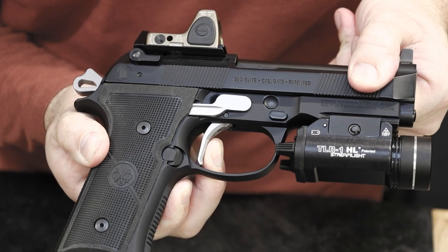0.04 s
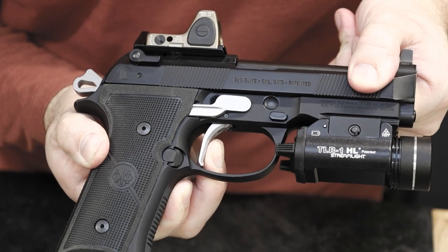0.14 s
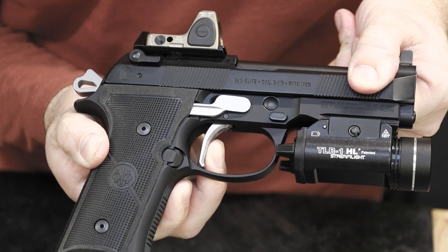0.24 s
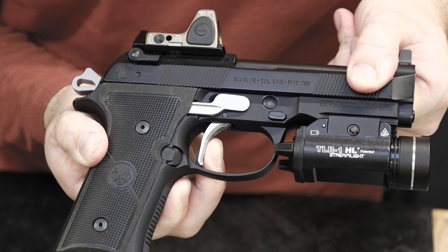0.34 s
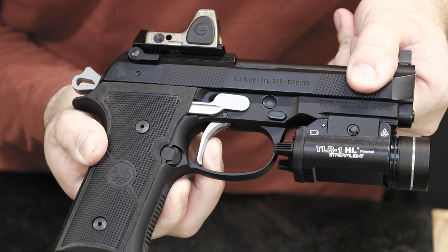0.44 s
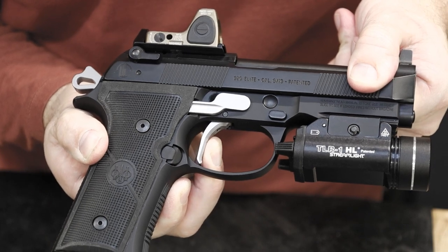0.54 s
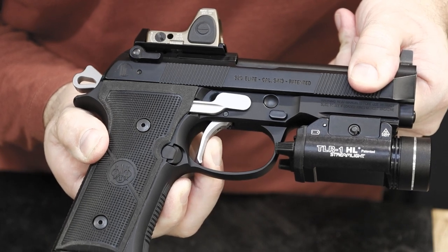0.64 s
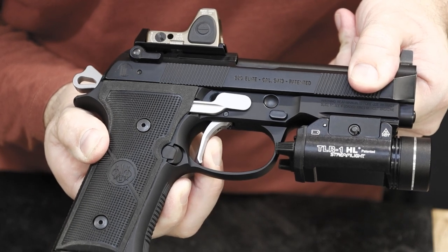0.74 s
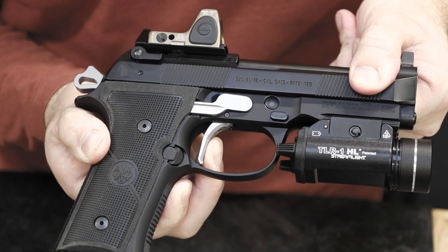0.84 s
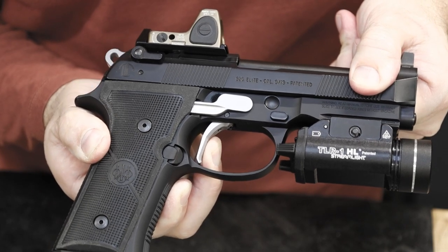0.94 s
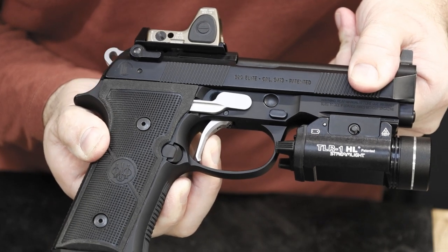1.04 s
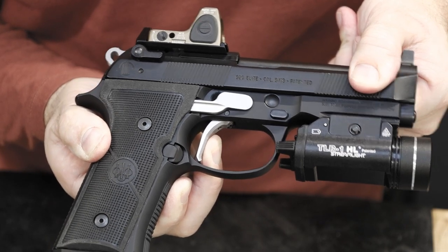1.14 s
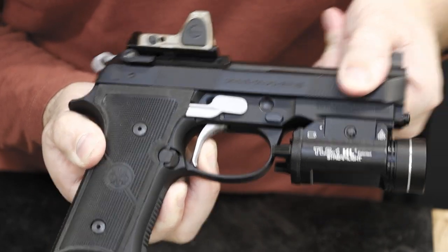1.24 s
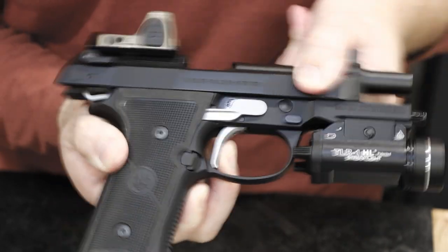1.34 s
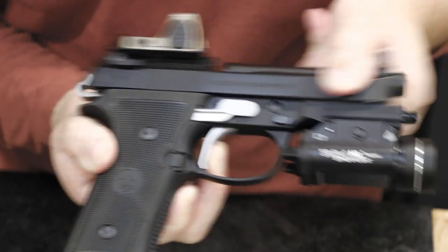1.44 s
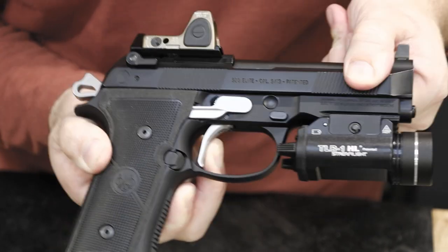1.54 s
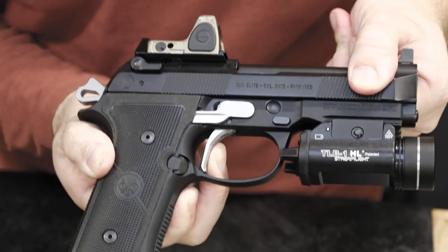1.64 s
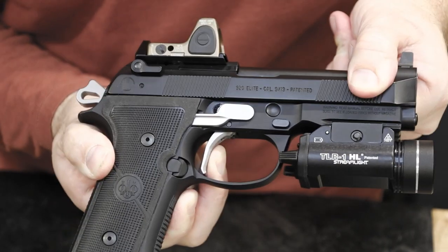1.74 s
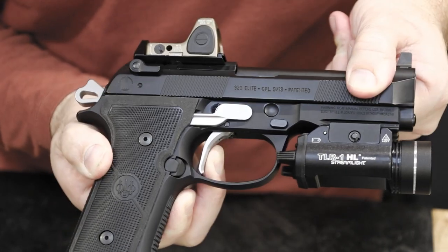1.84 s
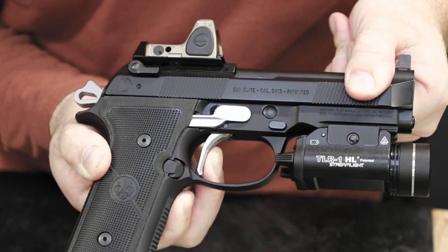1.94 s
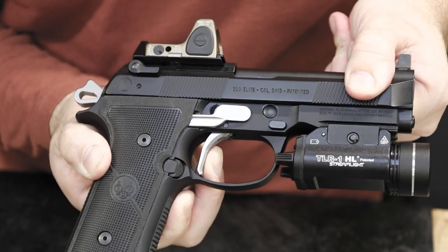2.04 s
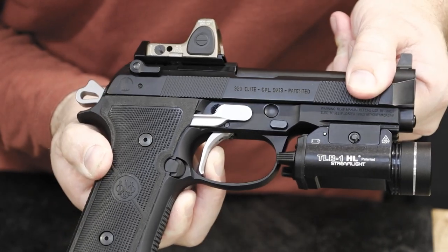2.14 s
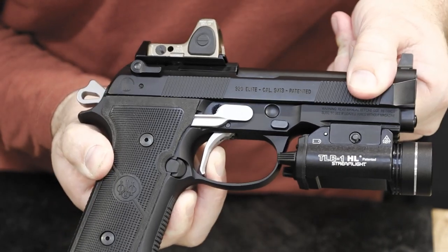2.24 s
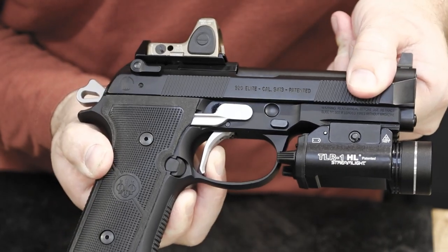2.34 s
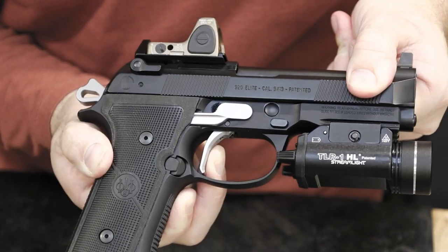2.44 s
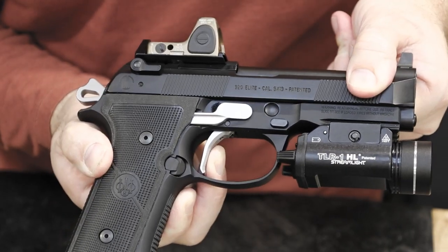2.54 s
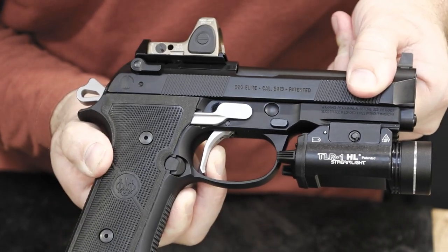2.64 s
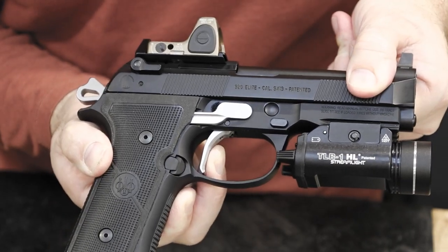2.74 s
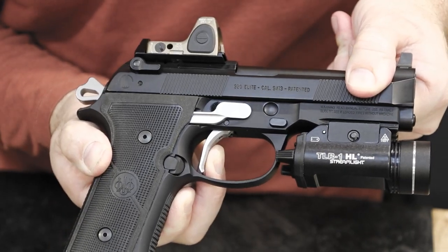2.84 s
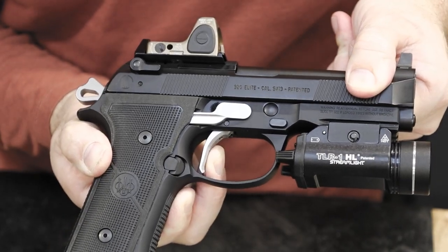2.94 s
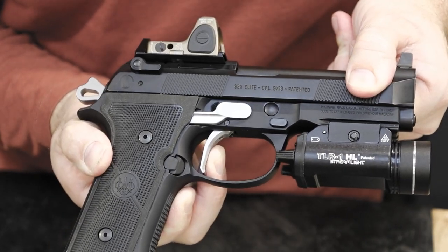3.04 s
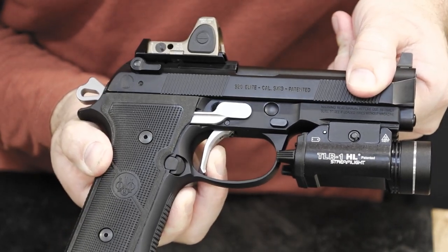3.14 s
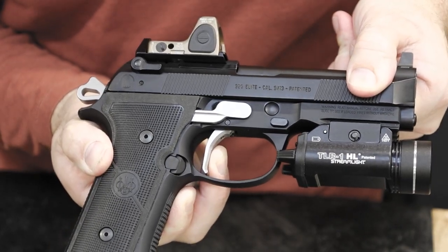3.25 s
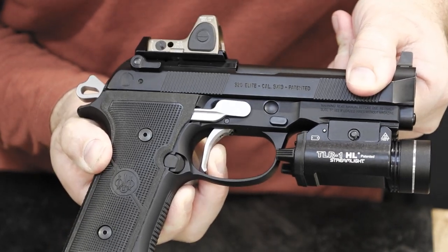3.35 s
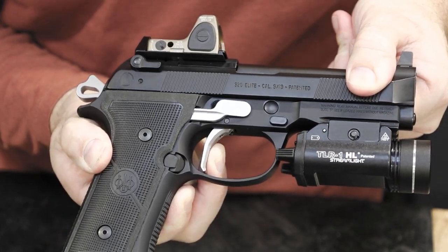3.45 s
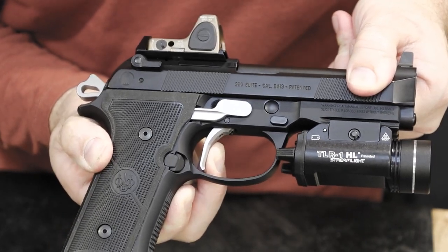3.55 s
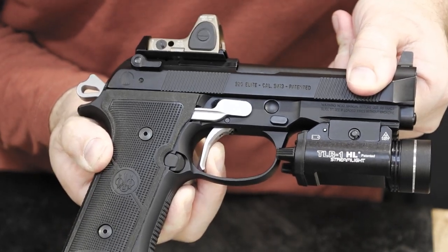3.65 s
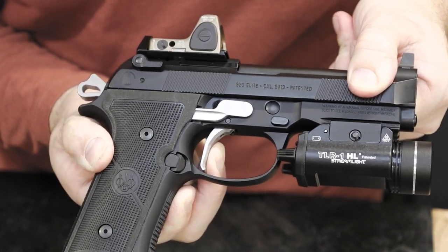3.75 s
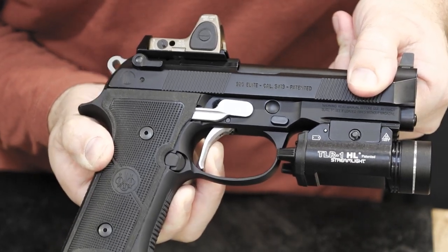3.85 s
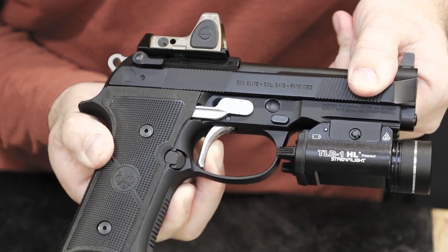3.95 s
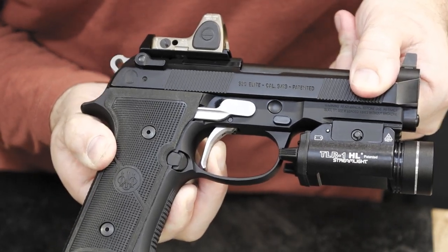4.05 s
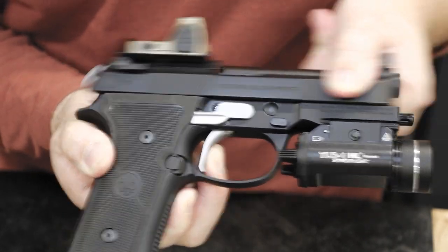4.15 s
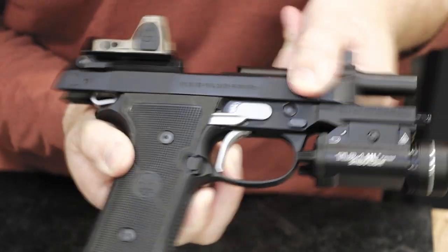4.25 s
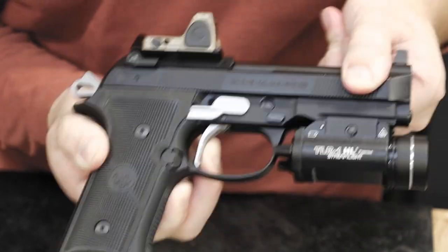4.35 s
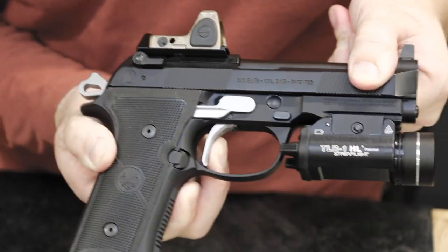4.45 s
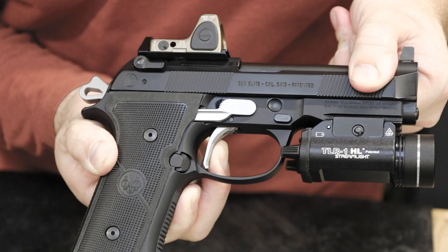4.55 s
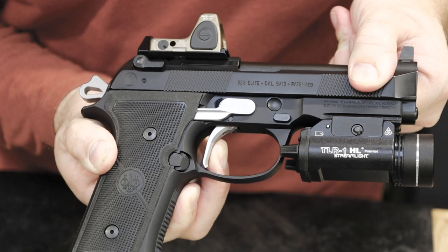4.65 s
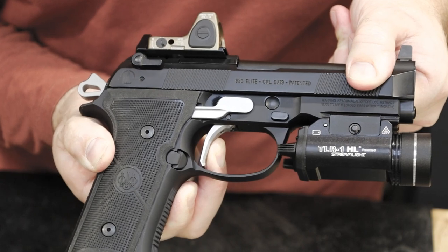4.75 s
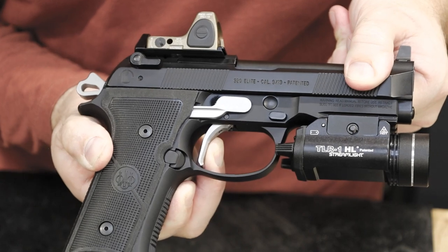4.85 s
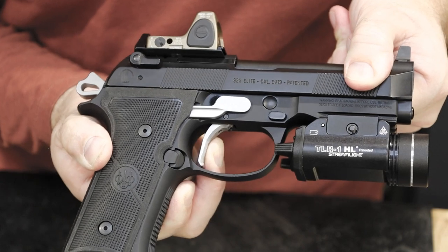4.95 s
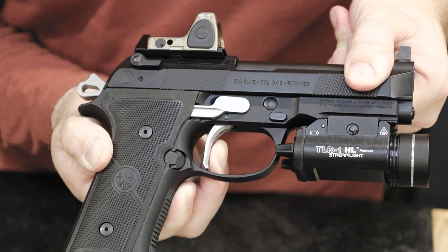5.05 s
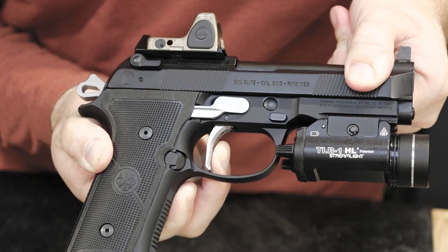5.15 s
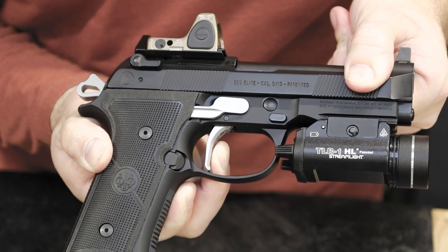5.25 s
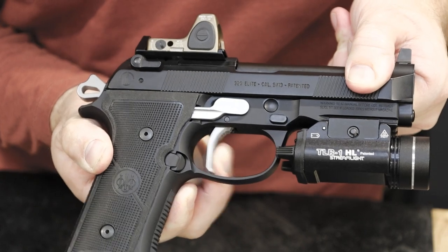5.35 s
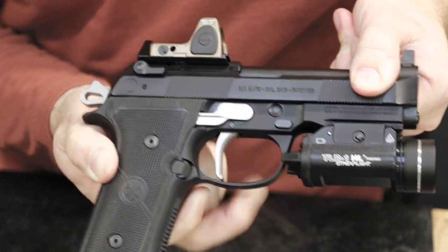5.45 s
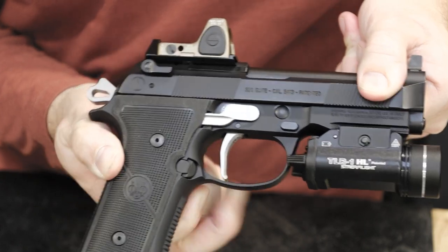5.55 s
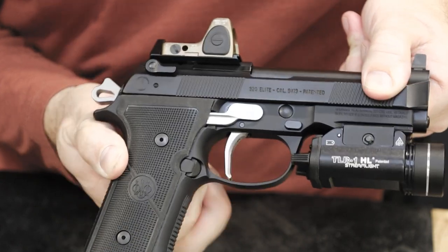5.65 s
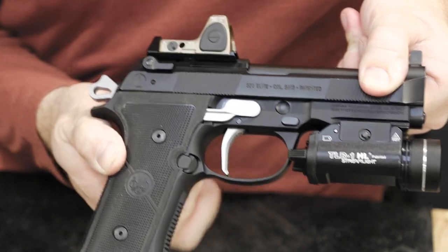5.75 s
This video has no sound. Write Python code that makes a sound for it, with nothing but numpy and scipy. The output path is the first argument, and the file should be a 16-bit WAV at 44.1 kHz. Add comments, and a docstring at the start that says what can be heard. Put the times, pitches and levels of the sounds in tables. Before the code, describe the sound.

Bright steel contacts of a handgun, captured close indoors: a crisp double-edged trigger reset, a cracking hammer fall, a clattering slide pull with brief scraping, and a heavy slam with a tiny bounce. It happens twice, then a last reset and barely audible ticks. Short room tails swell after hard blows, over soft air and motor hum.

```python
"""A click of a pistol's trigger resetting, then the fall of the hammer and the racked slide slamming shut, heard twice.
The unloaded pistol is close by in a hard, reverberant room; a last reset and light ticks follow over a ventilation hum.
Each contact is a noise crack, a sine knock and ringing modes; the rails rub with uneven noise.
One dull echo and decaying noise tails make the room; shaped noise makes the ventilation.
A limiter ducks on the hard blows and lets the room swell back."""
import sys
import numpy as np
from scipy import signal
from scipy.fft import rfft, irfft, next_fast_len
from scipy.io import wavfile
from scipy.ndimage import uniform_filter1d, minimum_filter1d

SR = 44100
rng = np.random.default_rng(int(sys.argv[2]) if len(sys.argv) > 2 else 0)


def wrap_up_sound(samples):
    """Save the sound to the file named by the first command line argument, as 16-bit audio."""
    columns = np.atleast_2d(samples).T
    # keep every value between -1 and 1, then stretch to whole-number steps
    tamed = np.clip(columns, -1, 1)
    steps = np.round(tamed * 32767).astype(np.int16)
    wavfile.write(sys.argv[1], SR, steps)


N = 255322  # length of the scene [samples]

# Slide pulled back: (time of the main blow [s], level [dB], treble tilt [dB per octave], slowness [1 = usual])
SLIDE_PULLS = [(1.3743, 0, 1, 1), (4.2393, 1.5, 1, .83)]
# Spring throws the slide shut: (time of the slam [s], level [dB], treble tilt [dB per octave],
# slowness [1 = usual], rebound after the slam [s], rebound level over the slam [dB])
SLIDE_RETURNS = [(1.5570, 11, 0.5, 1, .0083, -14), (4.4103, 13, 0, .72, .0187, -11)]
# Crack of the slide's steel on steel: (frequency [Hz], relative density [dB per Hz])
SLIDE_CRACK = [(40, -48), (300, -21), (800, -15.5), (1400, 3), (2700, 0.5), (3600, 3), (6000, -4),
               (9800, -5), (11000, -10), (16000, -20)]


def pistol():
    """Contacts and rubbing sent in one direction; each call draws new fine detail for another direction."""
    return trigger() + hammer() + slide() + rails(grit_db=3.5)


def trigger():
    """Small contacts ring the frame: trigger resets, then light ticks as the finger leaves the trigger."""
    # Ringing of the frame: (frequency [Hz], relative level [dB], t60 [s])
    frame_modes = [(1080, -19, 0.023), (1465, -11.5, .014), (1790, -7.5, 0.011), (2570, -10.5, 0.0064),
                   (3400, -1.5, .007), (3790, -13, .012), (5250, -18.5, 0.008), (6260, -16.5, 0.0056),
                   (7730, -13, .008), (9780, -10, 0.0059), (10230, -12.5, 0.0042)]
    # Crack of steel on the frame: (frequency [Hz], relative density [dB per Hz])
    frame_crack = [(40, -47), (300, -27.5), (800, -15), (1250, -1), (2200, 7), (3600, 2.5), (5500, 5.5),
                   (8000, 5), (11000, 2.5), (16000, -1)]
    # Light ticks: (time [s], level [dB], treble tilt [dB per octave], knock [Hz], knock level [dB], crack t60 [s])
    ticks = [(5.4698, -28.5, -3, 3400, 12, 0.011), (5.4985, -43, -4, 7000, -11, .02),
             (5.7343, -41, -4.5, 1100, 6, 0.012)]
    return contacts([*resets(), *ticks], frame_modes, frame_crack, crack_db=2, ring_db=1.5)


def resets():
    """The trigger bar snaps up, then seats on the sear in a second, softer and duller contact."""
    # Resets: (time [s], level [dB], treble tilt [dB per octave], knock [Hz], knock level [dB])
    trigger_resets = [(.2867, -5.5, -0.3, 1750, -7), (3.2690, -3.5, -0.5, 1780, 0),
                      (5.0787, -2, 2, 4800, 3)]
    crack_t60 = 0.010  # s, for both contacts
    seat_after_s, seat_db, seat_tilt_db = 0.0025, -8, -2  # tilt in dB per octave
    rows = []
    for s, db, tilt_db, *knock in trigger_resets:
        rows.append((s, db, tilt_db, *knock, crack_t60))
        rows.append((s + seat_after_s, db + seat_db, tilt_db + seat_tilt_db, *knock, crack_t60))
    return rows


def hammer():
    """The released hammer swings and strikes, and its own modes ring."""
    # Falls: (time of the strike [s], level [dB], treble tilt [dB per octave], slowness [1 = usual])
    hammer_falls = [(1.0070, 19, 0, 1), (3.9271, 19, 0, 1.02)]
    # In order: the sear lets go, the hammer swings (two contacts) and strikes.
    # (time from the strike at usual slowness [s], level over the fall's [dB], added tilt [dB per octave],
    # knock [Hz], knock level [dB], crack t60 [s])
    fall_contacts = [(-.0086, -27.5, -1.5, 1850, -3, .03), (-.0061, -27.5, .5, 1880, -3, .02),
                     (-.0030, -19, .5, 1940, -5, .011), (0, 0, 0, 3680, -10, .025)]
    # Ringing of the hammer: (frequency [Hz], relative level [dB], t60 [s])
    hammer_modes = [(1460, -18.5, .022), (1900, -12, .011), (3290, -17.5, 0.024), (3620, -16, .018),
                    (4330, -16.5, 0.014), (5950, -14, 0.018), (7554, -22, .01), (9600, -16, .01),
                    (10100, -18, 0.0089), (12800, -19.5, .015)]
    # Crack of the hammer's strike: (frequency [Hz], relative density [dB per Hz])
    hammer_crack = [(40, -50), (300, -29), (800, -16), (1300, -3), (2500, -5.5), (3500, 0), (6000, -4),
                    (7500, 0), (10000, 1), (16000, -6)]
    rows = actions(hammer_falls, fall_contacts)
    return contacts(rows, hammer_modes, hammer_crack, crack_db=-6.5, ring_db=-1)


def slide():
    """The slide is racked, slams shut and bounces; each contact rings its steel."""
    # Both chains: (time from the main blow at usual slowness [s], level over the action's [dB], added tilt [dB
    # per octave], knock [Hz], knock level [dB], crack t60 [s]) In order: three lighter contacts lead in, the
    # slide meets its rear stop in the main blow, and three more contacts follow.
    pull_contacts = [(-.0318, -28, -1, 3500, -12, .028), (-.0160, -23, -2, 2000, 0, .027),
                     (-.0098, -8, -1.5, 3300, -3, .013), (0, 1, 0.5, 7100, -2, .012),
                     (.0123, -9, 2.5, 1800, -3, .019), (.0238, -21, 1, 3300, -12, .02),
                     (.0424, -4.5, 4, 1340, -1, .014)]
    # In order: the slide picks up the barrel (two contacts), the barrel locks, steel slams on steel and chatters.
    return_contacts = [(-.0238, -21.5, -3, 2200, -6, .022), (-.0130, -22.5, -4.5, 1400, -12, .018),
                       (-.0102, -17, -3.5, 2200, -6, .014), (0, 0, 5, 5950, -4, .014),
                       (.0045, -11.5, -1, 4300, -9, .026)]
    # Ringing of the slide: (frequency [Hz], relative level [dB], t60 [s])
    slide_modes = [(1440, -19, .02), (2120, -7, .02), (3280, -21, .025), (3620, -16, .022),
                   (4320, -18.5, .035), (4540, -24.5, 0.018), (4860, -20.5, 0.011), (5840, -18.5, .028),
                   (6030, -16, .03), (7400, -17, 0.017), (8450, -19, .02), (8500, -24, .02),
                   (13190, -27.5, .05)]
    pulls = actions(SLIDE_PULLS, pull_contacts)
    returns = actions(SLIDE_RETURNS, return_contacts)
    rows = pulls + returns + rebounds()
    return contacts(rows, slide_modes, SLIDE_CRACK, crack_db=-0.5, ring_db=-4)


def rebounds():
    """The shut slide bounces once after each slam."""
    # One bounce: (treble tilt [dB per octave], knock [Hz], knock level [dB], crack t60 [s])
    bounce = (0, 2200, -4, .021)
    return [(s + after_s, db + over_db, *bounce)
            for s, db, _, _, after_s, over_db in SLIDE_RETURNS]


def rails(grit_db):
    """Steel rubs on steel in uneven catches while the slide moves."""
    slow_noise = uniform_filter1d(rng.standard_normal(N), size=130)  # averaged over about 3 ms
    catches = amp(grit_db * unit(slow_noise))
    rub = unit(catches * noise(lambda f: amp(along(SLIDE_CRACK, f))))
    pulling = stroke(SLIDE_PULLS, over_db=-31.5, swell_db_per_s=550, fade_db_per_s=170)
    returning = stroke(SLIDE_RETURNS, over_db=-35, swell_db_per_s=300, fade_db_per_s=3000)
    return rub * (pulling + returning)


def stroke(events, over_db, swell_db_per_s, fade_db_per_s):
    """Rubbing swells as the slide gathers speed and fades after the main blow; rates hold at usual slowness."""
    t = np.arange(N) / SR
    strength = np.zeros(N)
    for s, db, _, slowness, *_ in events:
        below_peak_db = np.maximum(swell_db_per_s * (s - t), fade_db_per_s * (t - s)) / slowness
        strength += amp(db + over_db - below_peak_db)
    return strength


def actions(events, chain):
    """Every action runs through its chain of contacts, harder or softer, brighter or duller, slower or faster."""
    return [(s + slowness * after_s, db + over_db, tilt_db + own_tilt_db, *knock)
            for s, db, tilt_db, slowness, *_ in events
            for after_s, over_db, own_tilt_db, *knock in chain]


def contacts(rows, modes, spectrum, crack_db, ring_db):
    """Each contact is a dense, quickly damped crack, a knock at the spot that is hit and the ring of the struck part."""
    out = np.zeros(N)
    ring_t = np.arange(SR // 4) / SR
    t = ring_t[:SR // 20]  # crack and knock are cut at 50 ms
    knock_cycles = 20  # cycles until the knock has fallen by 60 dB
    mode_hz, mode_db, mode_t60 = np.transpose(modes)
    swings = np.exp(np.outer(2j * np.pi * mode_hz - np.log(1000) / mode_t60, ring_t))
    attack = 1 - np.exp(-ring_t / 0.00032)  # time constant in s

    def fade(t60):
        """Exponential decay by 60 dB in t60 seconds."""
        return np.exp(-np.log(1000) * t / t60)

    for s, db, tilt_db, knock_hz, knock_level_db, t60 in rows:
        def hardness(f):
            """Treble tilt around 4 kHz, level below 800 Hz."""
            return amp(tilt_db * np.log2(np.maximum(f, 800) / 4000))

        burst = filtered(rng.standard_normal(len(t)), lambda f: amp(along(spectrum, f)) * hardness(f))
        crack = unit(burst) * fade(t60)
        knock = np.sin(2 * np.pi * knock_hz * t) * fade(knock_cycles / knock_hz)
        blow = amp(crack_db) * crack + amp(knock_level_db) * knock
        add(out, s, amp(db) * attack[:len(t)] * blow)
        phases = np.exp(2j * np.pi * rng.random(len(mode_hz)))
        strength = amp(mode_db) * hardness(mode_hz) * phases
        add(out, s, amp(db + ring_db) * attack * (strength @ swings).imag)
    return out


def near_wall(x, echo_db, delay_s, dull_hz):
    """A near surface returns one echo, delayed and dulled by a first-order low-pass."""
    def reflection(f):
        return np.exp(-2j * np.pi * f * delay_s) / (1 + 1j * f / dull_hz)

    return amp(echo_db) * filtered(x, reflection)


def room(wet_db, count):
    """The walls gather sound from several directions, which blends into one smooth wash."""
    wash = sum(reverberation(pistol(), build_s=0.0014) for _ in range(count))
    return amp(wet_db) * wash / np.sqrt(count)


def reverberation(x, build_s):
    """A diffuse noise tail builds up quickly, then each frequency decays at its own rate, high treble soonest."""
    # Decay of the room: (frequency [Hz], t60 [s])
    room_t60 = [(200, .5), (1000, 0.65), (2100, 0.6), (4000, 0.67), (6000, 0.58), (7500, .49),
                (10000, 0.44), (15000, 0.33)]
    # Colour of the tail before it decays: (frequency [Hz], relative level [dB])
    room_colour = [(200, -9.5), (1000, -4), (2000, 1.5), (3500, 3), (6000, 5), (9000, -3), (15000, -4.5)]
    hz, t, z = signal.stft(rng.standard_normal(3 * SR // 4), SR, nperseg=256)
    colour = amp(along(room_colour, hz))[:, None]
    decay = np.exp(-np.log(1000) * t / along(room_t60, hz)[:, None])
    build_up = 1 - np.exp(-t / build_s)
    tail = signal.istft(z * colour * decay * build_up, SR, nperseg=256)[1]
    return signal.oaconvolve(x, tail / np.linalg.norm(tail))[:N]


def ventilation(air_db, hum_db):
    """Moving air is broad shaped noise; a motor and its duct add narrow-band drones."""
    # Moving air: (frequency [Hz], relative density [dB per Hz])
    air_spectrum = [(15, -59), (25, -33.5), (55, -14), (91, -23.5), (113, -10.5), (156, -20), (188, -17),
                    (281, -4), (340, -10.5), (457, -9.5), (648, -16), (741, -13), (1200, -19), (6550, -40),
                    (15500, -48)]
    # Drones: (frequency [Hz], width at half amplitude [Hz], relative level [dB])
    drones = [(120.07, 0.81, -60), (199, 42, -55), (229, 1.7, -60.5), (284.4, 20, -50), (469, 7, -56),
              (736, 20, -64)]
    air = noise(lambda f: amp(along(air_spectrum, f)))
    hum = np.zeros(N)
    for hz, width, db in drones:
        hum += amp(db) * noise(lambda f: 1 / (1 + (2 * (f - hz) / width) ** 2))
    return amp(air_db) * air + amp(hum_db) * hum


def amp(db):
    """Decibels to gain."""
    return 10 ** (np.asarray(db) / 20)


def unit(x):
    """Scale to rms 1."""
    return x / np.sqrt(np.mean(x ** 2) + 1e-20)


def along(points, hz):
    """Interpolate (frequency [Hz], value) points on a log frequency axis."""
    f, v = np.transpose(points)
    return np.interp(np.log(hz + 1), np.log(f + 1), v)


def filtered(x, response):
    """Multiply the spectrum of x by a response of frequency."""
    size = next_fast_len(len(x) + 8192)
    spectrum = rfft(x, size) * response(np.fft.rfftfreq(size, 1 / SR))
    return irfft(spectrum, size)[:len(x)]


def noise(response):
    """Coloured noise of rms 1."""
    return unit(filtered(rng.standard_normal(N), response))


def add(track, s, sound):
    """Mix a sound in at time s, in seconds."""
    part = track[round(s * SR):][:len(sound)]
    part += sound[:len(part)]


def scene():
    """The pistol close by, the room's answer and the ventilation."""
    direct = pistol()
    echo = near_wall(direct, echo_db=-17, delay_s=0.0098, dull_hz=7000)
    wash = room(wet_db=-13.5, count=4)
    background = ventilation(air_db=-47, hum_db=-1.5)
    return (direct + echo + wash + background)[None]


def limiter(x, threshold_db, release_db_per_s, attack_s):
    """The gain drops quickly on a loud blow, is held briefly and climbs back at a steady rate in dB."""
    power = np.abs(uniform_filter1d(x ** 2, size=88))  # about 2 ms
    needed_db = np.minimum(threshold_db - 10 * np.log10(power + 1e-12), 0)
    held_db = minimum_filter1d(needed_db, size=801, origin=400)  # holds for about 18 ms
    climb = release_db_per_s * np.arange(N) / SR
    gain_db = np.minimum.accumulate(held_db - climb) + climb
    keep = np.exp(-1 / (attack_s * SR))
    smooth_db = signal.lfilter([1 - keep], [1, -keep], gain_db)
    return x * amp(smooth_db)


def record(dry):
    """Limiter, clipping of the peaks that slip past it, and the band limit."""
    held = limiter(dry[0], threshold_db=-4, release_db_per_s=121, attack_s=0.00076)
    clipped = np.clip(held, -1, 1)
    top_hz, slope_hz = 16000, 400  # middle and width of the treble cut-off
    return filtered(clipped, lambda f: np.clip((top_hz - f) / slope_hz + 0.5, 0, 1))[None]


dry = scene()
out = record(dry)
wrap_up_sound(out)
```